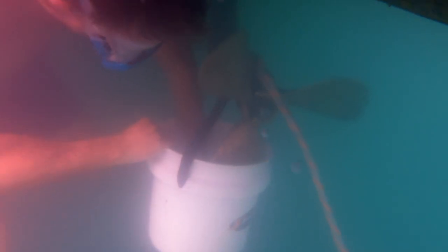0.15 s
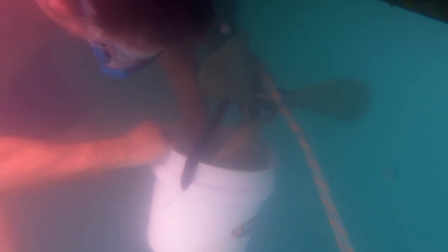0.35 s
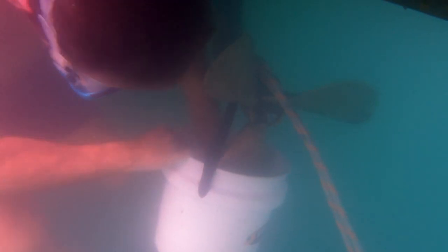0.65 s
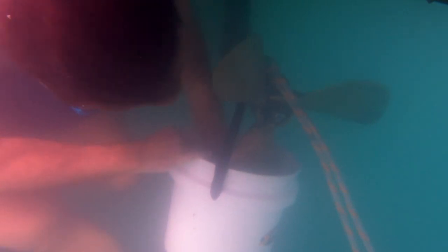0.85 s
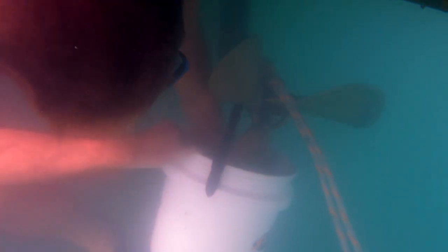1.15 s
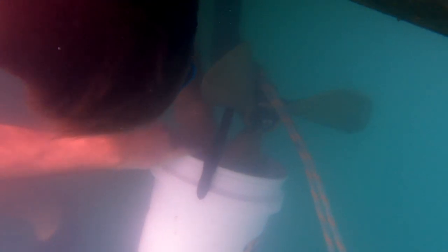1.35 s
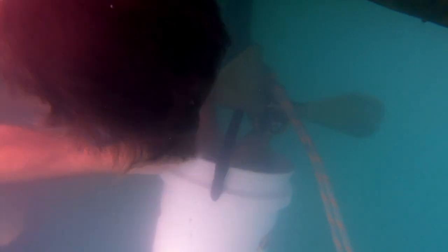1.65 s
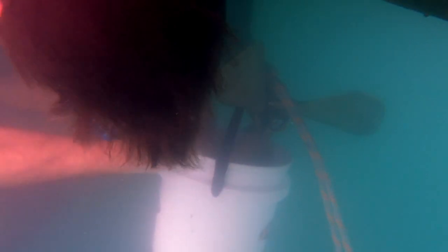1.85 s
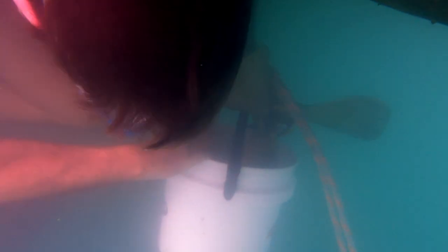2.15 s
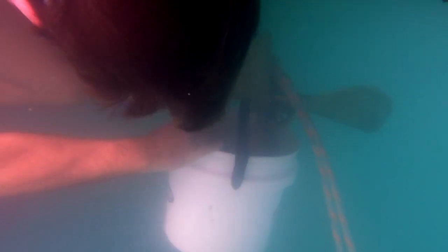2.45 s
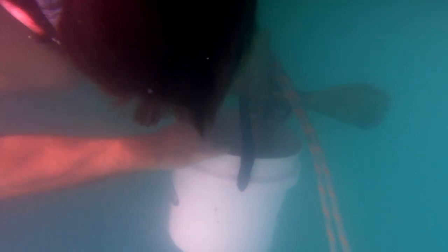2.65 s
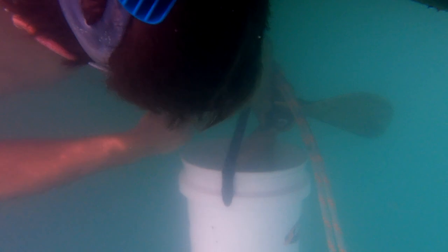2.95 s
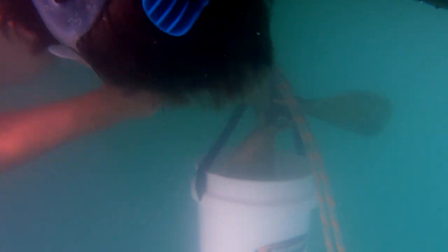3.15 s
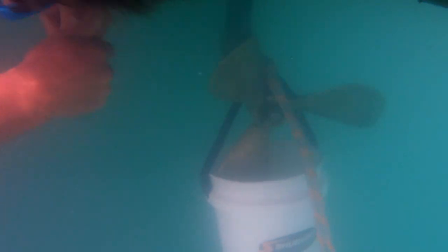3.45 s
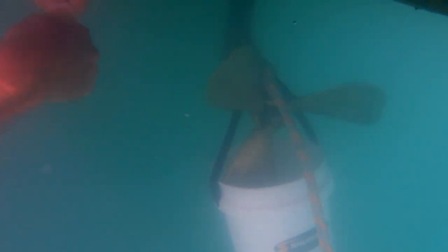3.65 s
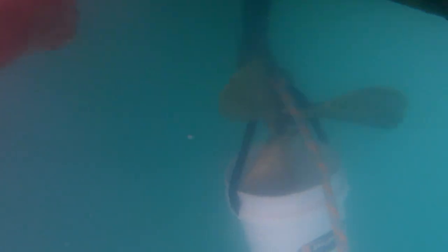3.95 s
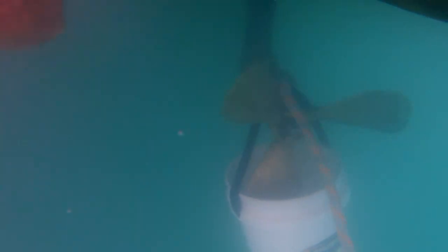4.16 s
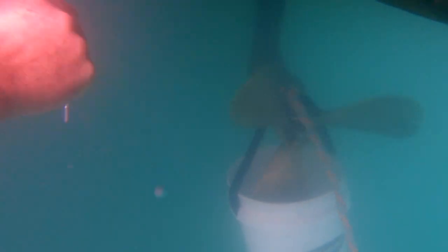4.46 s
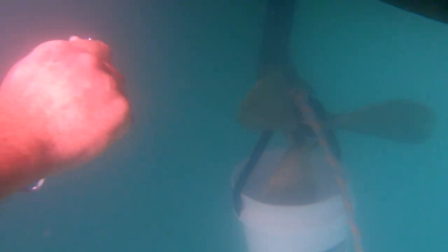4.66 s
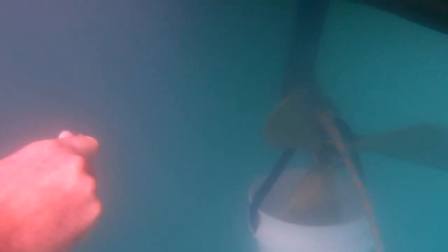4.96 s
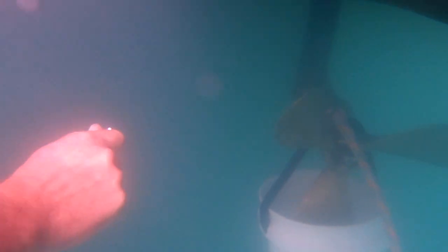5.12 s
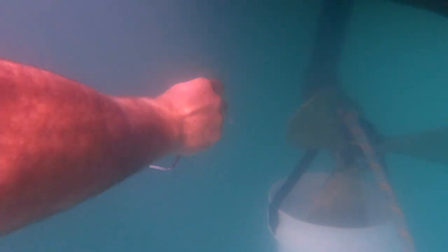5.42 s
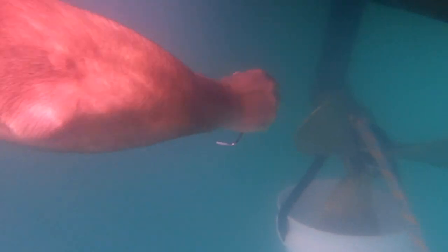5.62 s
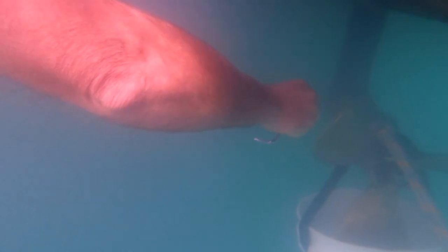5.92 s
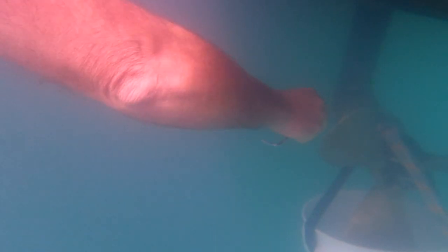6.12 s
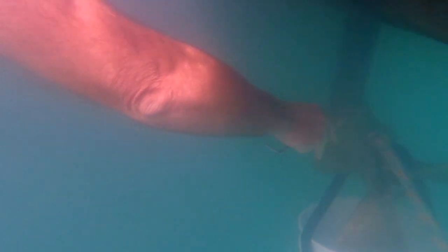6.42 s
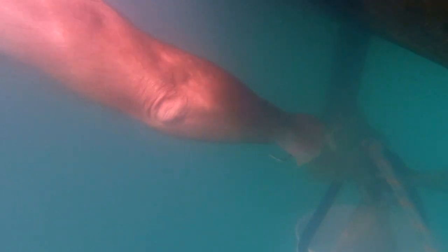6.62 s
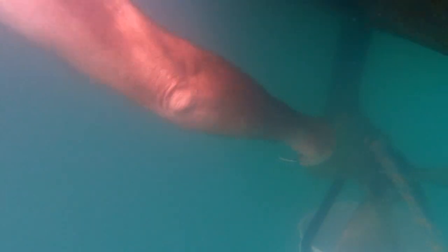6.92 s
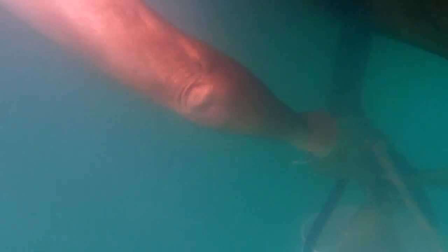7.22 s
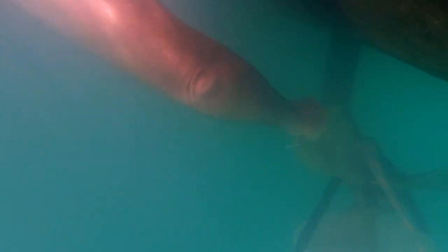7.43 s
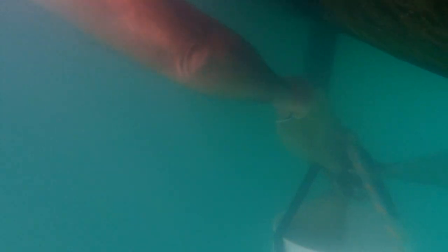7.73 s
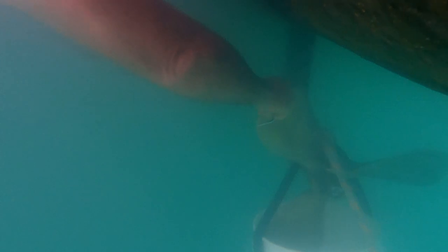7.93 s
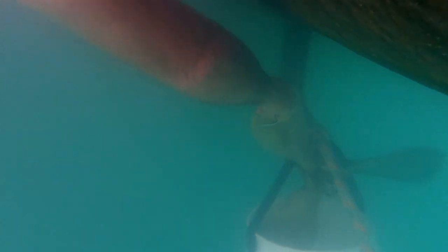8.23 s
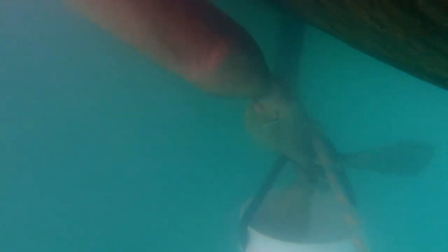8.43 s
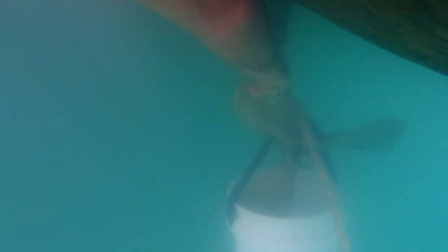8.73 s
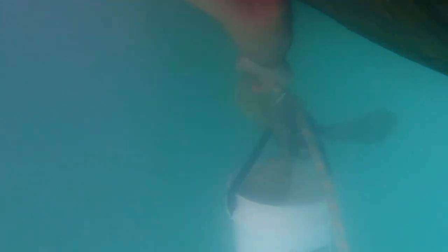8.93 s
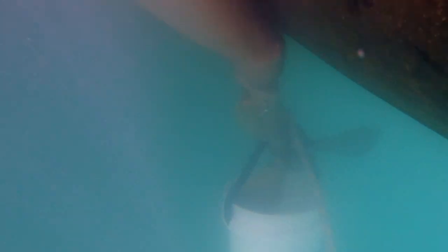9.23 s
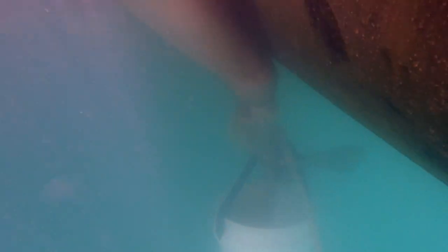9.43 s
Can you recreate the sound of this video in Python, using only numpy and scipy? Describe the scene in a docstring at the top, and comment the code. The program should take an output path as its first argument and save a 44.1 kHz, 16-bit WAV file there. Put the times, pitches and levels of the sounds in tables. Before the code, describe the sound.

Sealed-in underwater sound: bubbles crowd and gurgle, hands knock sharply at a boat propeller, a long watery rush passes, then small plops remain.

```python
"""A sealed camera hangs under a boat while a diver's hands work at the propeller; water rumbles on the case throughout.
It opens on a crowd of gulping air pockets and gurgling rushes, built from swelling, decaying gliding sines.
The gulps thin out after about 3 s; the hardest taps, clicks with noise tails ringing the case, land around 5 s.
A long rush follows, air pockets surge near 8.1 s, and the end is sparse: plops, faint taps and fizz of tiny ticks.
The recorder's gain control ducks after each loud blow."""
import sys
import numpy as np
from scipy import signal
from scipy.io import wavfile

SR = 44100
rng = np.random.default_rng(int(sys.argv[2]) if len(sys.argv) > 2 else 0)


def log_audio(samples):
    """Write samples as a 16-bit WAV file to the path given in sys.argv[1]."""
    # one column per channel
    frames = np.atleast_2d(samples).T
    # limit to full scale, then quantise
    limited = np.clip(frames, -1, 1)
    pcm = np.round(limited * 32767).astype(np.int16)
    wavfile.write(sys.argv[1], SR, pcm)


N = 422457


def from_db(db):
    """Decibels to linear gain."""
    return np.exp(np.asarray(db) * np.log(10) / 20)


def rms_one(x):
    """Bring a sound to an rms of 1."""
    return x / np.sqrt(np.mean(x ** 2) + 1e-20)


def drift(rate):
    """Slow random curve of rms 1: noise through two equal poles at `rate` Hz, drawn every 40 samples."""
    r = np.exp(-80 * np.pi * rate / SR)
    noise = rng.standard_normal(N // 40 + 2002)
    slow = signal.lfilter([1], [1, -2 * r, r * r], noise)[2000:]   # skip the filter's start
    return np.interp(np.arange(N) / 40, np.arange(len(slow)), rms_one(slow))


def in_time(rows):
    """Draw each column of a table as a curve over all samples; the first column is time in seconds."""
    s, *columns = np.transpose(rows)
    return [np.interp(np.arange(N) / SR, s, column) for column in columns]


def through(x, modes):
    """Parallel resonances of alternating polarity, each applied twice so that the valleys stay dark."""
    out = 0
    for k, (hz, width, db) in enumerate(modes):
        r = np.exp(-np.pi * width / SR)
        b = (1 - r * r) / 2 * np.array([1, 0, -1])
        a = [1, -2 * r * np.cos(2 * np.pi * hz / SR), r * r]
        once = signal.lfilter(b, a, x + 1e-18)
        out = out + (-1) ** k * from_db(db) * signal.lfilter(b, a, once)
    return out


def add(out, s, sound):
    """Mix a sound in at a time in seconds."""
    at = max(round(s * SR), 0)
    out[at:at + len(sound)] += sound[:N - at]


def bubble(hz, t60, glide, swell_s):
    """A pocket of air pinches off with a dip in pressure, swells and rings down while its pitch glides."""
    t60, swell_s = np.clip(t60, .008, .5), np.clip(swell_s, .0003, .03)
    full_s = 2 * swell_s   # swell_s is the time to half level
    t = np.arange(int((t60 + full_s) * SR)) / SR
    swell = np.sin(np.pi / 2 * np.minimum(t / full_s, 1)) ** 2
    decay = from_db(-60 * np.maximum(t - full_s, 0) / t60)
    return -swell * decay * np.sin(2 * np.pi * hz * (t + glide * t * t / t60))


# Large air pockets. Each row: time in seconds, level in dB before the case muffles it, starting pitch in Hz,
# base decay t60 in seconds, starting pitch of the second pocket in Hz, its level in dB above the first.
AIR_GULPS = [(0.102, -21, 363, 0.17, 301, -11), (0.161, -8, 494, 0.098, 295.5, 0),
             (0.387, -6, 508, 0.12, 295, -10), (0.482, -6.5, 302, 0.098, 520, -11),
             (0.631, -14.5, 311, 0.17, 323, -18), (0.676, -5, 312, 0.064, 281, 2),
             (0.704, 3, 271, 0.047, 272, -10), (0.782, -20, 286, 0.13, 151, 5.5),
             (0.856, -13, 515, 0.056, 232, -0.5), (0.887, -6, 409, 0.11, 309, -7),
             (0.941, -10.5, 362, 0.086, 181.4, -1.5), (0.975, -9.5, 292, 0.11, 279, -37),
             (1.02, -14, 300, 0.061, 313, -2.5), (1.09, -10.5, 537, 0.072, 286, -5),
             (1.127, -11.5, 417, 0.2, 117.4, -1), (1.146, 1, 339, 0.16, 227, -4),
             (1.219, -6.5, 435, 0.3, 227.4, -0.5), (1.303, -8, 305, 0.14, 198.4, 5.5),
             (1.351, -6.5, 610, 0.075, 239, 0), (1.424, 1.5, 412, 0.081, 219, -17),
             (1.458, -3, 392, 0.19, 239, -10), (1.608, -11.5, 456.5, 0.16, 236.5, 1),
             (1.745, 0.5, 364, 0.17, 236.3, 2.5), (1.787, -8, 346.4, 0.21, 300, -15),
             (1.835, -5, 452.5, 0.35, 214, -13.5), (1.912, -4, 407.4, 0.18, 239, -9.5),
             (1.964, -9.5, 364, 0.35, 209.4, -7.5), (1.999, -8, 419, 0.23, 254, -7.5),
             (2.043, -8, 385, 0.092, 255, -10), (2.211, -11, 622, 0.04, 242, -9),
             (2.258, -8.5, 536, 0.13, 122.6, -9.5), (2.303, -9.5, 474, 0.1, 263, -14.5),
             (2.345, -11.5, 451, 0.09, 213, -5.5), (2.554, -15.5, 592, 0.035, 202, -2.5),
             (2.762, -8.5, 533, 0.11, 104, -8.5), (3.162, -22, 280, 0.14, 118.5, 12),
             (3.185, -17.5, 292, 0.04, 234, 13), (3.252, -22.5, 425, 0.021, 237, 6),
             (3.407, -3, 497, 0.037, 185, -12.5), (3.492, -18, 350, 0.093, 226, 3),
             (3.569, -3.5, 322, 0.059, 246, -10.5), (3.6, -9.5, 300, 0.09, 113, 1.5),
             (3.903, -18.5, 455, 0.18, 92, -18), (3.928, -12, 537, 0.039, 185, -14),
             (3.966, -12, 527, 0.096, 210, 1.5), (4.036, -28, 474, 0.26, 229.7, 23.5),
             (4.088, -25.5, 417, 0.097, 243, 5), (4.326, -18.5, 330, 0.07, 105, 15.5),
             (4.357, -31.5, 365, 0.36, 92.5, 16.5), (4.226, -27.5, 456, 0.095, 273, 1),
             (4.788, -16, 592, 0.043, 92, -3), (4.936, -28, 342, 0.083, 214, 0),
             (5.294, -4, 314, 0.077, 302, -19), (5.328, -19.5, 343, 0.38, 131.3, 4.5),
             (5.49, -20, 384, 0.13, 125, -6), (5.576, -23, 407, 0.13, 131, -4),
             (5.996, -17.5, 405, 0.068, 250, -11.5), (6.06, -12, 356, 0.15, 202, -1.5),
             (6.089, -14, 304, 0.054, 189, 2), (6.165, -12, 355, 0.082, 239, -12),
             (6.301, -18, 414, 0.12, 265, 4), (6.329, -16.5, 395, 0.081, 190, 6),
             (6.795, -18, 323, 0.07, 216, -2), (7.177, -13.5, 344, 0.038, 125, 1),
             (7.555, -37, 414, 0.032, 253, 7.5), (7.623, -24.5, 307, 0.18, 90, -3),
             (8.402, -21.5, 285, 0.11, 174.5, 14.5), (8.531, -22, 263, 0.033, 94, 12.5),
             (8.693, -21.5, 345, 0.1, 105, -8), (9.212, -22.5, 558, 0.062, 340, 0)]


def gulps():
    """Each gulp is two fluttering pockets and the short pop of its neck closing."""
    pockets, pops = np.zeros((2, N))
    pop = bubble(260, .016, -0.13, .0016)
    for s, db, hz, t60, second_hz, second_db in AIR_GULPS:
        add(pockets, s - .002, from_db(db - 0.5) * bubble(hz, t60, 0.038, 0.0019))
        add(pockets, s - .0012, from_db(db + second_db - 1.0) * bubble(second_hz, 1.224 * t60, 0.1, 0.0018))
        add(pops, s - .001, from_db(db - 4) * pop)
    flutter_db = 2.2 * np.clip(drift(60.0), -3, 1.2)
    return pockets * from_db(flutter_db) + pops


# Pockets with their own swell, mostly slow, then a decay. Each row: time of full swell in seconds, level in dB
# before the muffling, starting pitch in Hz, swell to half level in seconds, t60 in seconds,
# glide as half the pitch share gained in a t60.
AIR_SURGES = [(5.278, -25, 670, 0.012, 0.11, 0.043), (5.654, -13.5, 481, 0.0092, 0.056, 0.22),
              (8.098, -11, 493, 0.014, 0.03, -0.079), (8.113, -2.5, 260, 0.015, 0.0097, -0.0079),
              (8.118, -10.5, 161.7, 0.0023, 0.13, -0.017)]


def surges():
    """Single pockets with their own swell and glide, each timed to be fully swollen on its row."""
    out = np.zeros(N)
    for s, db, hz, swell_s, t60, glide in AIR_SURGES:
        add(out, s - 2 * swell_s, from_db(db) * bubble(hz, t60, glide, swell_s))
    return out


def splashes():
    """Every gulp and surge throws up a dying burst of noise in one resonance."""
    level = np.zeros(N)
    dying = from_db(-60 * np.arange(int(.06 * SR)) / SR / 0.053)
    for s, db, *_ in AIR_GULPS:
        add(level, s - .001, from_db(db - 10.0) * dying)
    for s, db, *_ in AIR_SURGES:
        add(level, s - .008, from_db(db) * dying)
    return through(level * rng.standard_normal(N), [(530, 230, 0.011)])


# Stronger shoves of water on the case. Each row: time in seconds, level in dB before the muffling.
WATER_SHOVES = [(0.885, -15), (0.975, -10), (1.145, -2.5), (1.217, -16), (1.455, -5.5), (1.837, -3.5),
                (2.207, -25), (2.577, -13.5), (2.761, -16.5), (3.166, -12), (3.417, -1), (3.493, -13),
                (3.993, -8.5), (4.358, -17), (6.299, -15), (7.088, -17.5), (8.403, -5), (8.983, -10.5),
                (9.412, -13)]


def shoves():
    """Water thumps the case: one short low pulse whose pitch falls from 125 Hz."""
    out = np.zeros(N)
    shove = bubble(125, 0.036, -0.37, 0.0022)
    for s, db in WATER_SHOVES:
        add(out, s - .002, from_db(db) * shove)
    return out


# Slow seep of air between the rushes. Each row: time in seconds, gurgle level in dB, gurgle centre in Hz,
# swish level in dB before a fixed lift.
AIR_SEEP = [(0.0, -34, 358, -50), (0.36, -41.5, 398, -48.5), (0.42, -53, 508, -62), (0.47, -43, 389, -41.5),
            (1.07, -33, 331, -49.5), (1.55, -37.5, 390.5, -47.5), (1.8, -33, 341, -59.5),
            (2.2, -38, 413.5, -57), (2.6, -33, 293.3, -51), (2.95, -49.5, 199.5, -65.5),
            (3.3, -30.5, 253, -51.5), (4.2, -38.5, 248, -51), (4.55, -52, 153.4, -84),
            (5.2, -52.5, 202.8, -67.5), (5.65, -40, 447.4, -53.5), (6.55, -42, 202, -61),
            (7.05, -41, 171, -63), (7.6, -39.5, 172.8, -62.5), (8.05, -49, 182, -67),
            (8.17, -47.5, 176, -65), (8.32, -49, 173.7, -59), (8.65, -47, 204, -65.5),
            (9.58, -33.5, 171.7, -56)]
# Rushes of water and air past the case. Each row: start, swell, hold and fade in seconds, gurgle level in dB,
# gurgle centre in Hz, swish level in dB before a fixed lift.
AIR_RUSHES = [(0.096, 0.067, 0.054, 0.11, -21.5, 326, -68), (0.558, 0.12, 0.13, 0.066, -20.5, 232.2, -52),
              (1.065, 0.1, 0.24, 0.063, -20, 239.4, -47), (0.841, 0.02, 0.13, 0.081, -29.5, 332.5, -53),
              (1.574, 0.042, 0.034, 0.064, -21.5, 317.5, -55.5), (3.44, 0.049, 0.23, 0.15, -21, 231, -43.5),
              (3.913, 0.051, 0.065, 0.15, -18.5, 225.4, -40),
              (4.306, 0.02, 0.038, 0.063, -25, 164.7, -41.5), (4.704, 0.016, 0.13, .1, -38, 489, -55),
              (5.259, 0.018, 0.06, 0.23, -21.5, 198.4, -52), (5.728, 0.3, 0.33, 0.089, -19, 262.6, -51),
              (7.1, 0.049, 0.029, .1, -22.5, 239.5, -56), (7.486, 0.036, 0.042, 0.044, -39.5, 196.7, -49.5),
              (7.716, 0.027, 0.38, 0.013, -38.5, 202.3, -51), (8.363, 0.026, 0.1, 0.072, -42, 190.3, -55),
              (8.698, 0.11, .6, 0.23, -45, 188.5, -54.5)]


def flow():
    """Seep and rushes add up; the gurgle's centre leans to whichever is stronger."""
    t = np.arange(N) / SR
    seep_db, seep_hz, swish_db = in_time(AIR_SEEP)
    air, swish_level = from_db(seep_db), from_db(swish_db)
    weighted_hz = air * seep_hz
    for s, swell_s, hold_s, fade_s, db, hz, rush_swish_db in AIR_RUSHES:
        edges = s + np.cumsum([0, swell_s, hold_s, fade_s])
        shape = np.interp(t, edges, [0, 1, 1, 0]) ** 2
        rush = from_db(db) * shape
        air = air + rush
        weighted_hz = weighted_hz + rush * hz
        swish_level = swish_level + from_db(rush_swish_db) * shape
    return 20 * np.log10(air), weighted_hz / air, 20 * np.log10(swish_level)


def gurgle(centre_hz, per_s, spread, cycles):
    """A random stream of bubbles scattered `spread` octaves about a centre, ringing for `cycles`; rms 1."""
    out, count = np.zeros(N), int(per_s * N / SR)
    when, chance = rng.uniform(0, N / SR, count), rng.standard_normal((count, 3))
    for s, (pitch, level, bend) in zip(when, chance):
        hz = np.clip(centre_hz[int(s * SR)] * 2 ** (spread * pitch), 90, 2300)
        add(out, s, from_db(4.0 * level) * bubble(hz, cycles / hz, 0.097 * bend, 0.44 / hz))
    return rms_one(out)


# Single plops and bubbles, low and high. Each row: time in seconds, level in dB before the wobble,
# starting pitch in Hz, t60 in seconds.
SINGLE_BUBBLES = [(0.481, -14, 600, 0.035), (1.302, -19.5, 656, 0.032), (1.353, -20, 1374, 0.066),
                  (1.609, -21.5, 595, 0.038), (0.631, -21.5, 887, 0.043), (0.71, -16.5, 1038, 0.075),
                  (0.851, -32.5, 908, 0.19), (1.21, -22.5, 922, 0.065), (1.749, -21.5, 926, 0.047),
                  (1.838, -15.5, 917, 0.075), (2.037, -18, 866, 0.11), (2.325, -29, 853, 0.063),
                  (2.688, -29, 768, 0.097), (3.402, -19, 958, 0.046), (3.474, -27, 867, 0.053),
                  (3.678, -20, 880, 0.029), (3.705, -20, 1300, 0.042), (3.968, -21.5, 895, 0.047),
                  (4.974, -38.5, 1160, 0.098), (5.28, -16.5, 1070, 0.037), (6.144, -26, 748, 0.06),
                  (6.85, -33, 860, 0.033), (6.902, -36.5, 765, 0.12), (7.095, -31, 853, 0.04),
                  (7.168, -30.5, 750, 0.031), (7.36, -38, 714, .05), (7.364, -28.5, 336, 0.088),
                  (7.421, -23, 339, 0.087), (7.489, -20, 277, 0.07), (7.789, -29, 560, 0.042),
                  (8.81, -43, 875, 0.035), (8.921, -27, 573, 0.023), (8.982, -26.5, 577, .04),
                  (9.072, -30, 600, .03), (9.11, -21.5, 520, 0.025), (9.179, -30, 605, .035),
                  (9.371, -23.5, 546, 0.027), (9.46, -27, 580, 0.038), (6.131, -17, 445, 0.045),
                  (3.4752, -22.5, 1750, 0.02), (3.51, -26, 1615, 0.031), (3.716, -23, 1875, 0.046),
                  (3.8065, -35.5, 1980, 0.042), (3.862, -28, 1850, 0.054), (5.1866, -19.5, 1737, 0.043),
                  (5.1993, -22.5, 1620, 0.019), (5.386, -27.5, 1635, 0.034), (6.218, -27, 1484, 0.022),
                  (7.5577, -28, 2110, 0.03), (7.559, -29, 1480, 0.02), (7.558, -26, 723, 0.015),
                  (1.769, -35, 1393, 0.06), (1.809, -37.5, 1320, 0.071)]


def blips():
    """Single plops and bubbles, low and high; one shared level wobble stands for their wobbling as they rise."""
    out = np.zeros(N)
    for s, db, hz, t60 in SINGLE_BUBBLES:
        add(out, s - .002, from_db(db) * bubble(hz, t60, 0.04, 0.0015))
    return out * from_db(2.2 * drift(120.0))


# Taps on metal and case. Each row: time in seconds, relative drive in dB, brightness in dB (extra drive to the
# upper resonances, before a fixed trim), tail t60 in seconds (held to 0.3 at most).
CASE_TAPS = [(0.0348, -33, -30, .05), (0.116, -34, -13, 0.17), (0.205, -36.5, -19, 0.062),
             (0.257, -37.5, -11.5, 0.042), (0.345, -52, -12, 0.2), (0.471, -55.5, 1.5, 0.13),
             (0.48, -29, -14, 0.04), (0.541, -46.5, -7, 0.15), (0.576, -41, -10, .05),
             (0.63, -38, -13.5, 0.091), (0.6605, -43.5, -7, 0.086), (0.75, -41, -18, .05),
             (0.7956, -42.5, -18, 0.069), (0.908, -32, -29, 0.076), (0.9375, -41, -13, 0.049),
             (0.9625, -44, -10, .05), (1.0085, -46, -7, 0.066), (1.0443, -48, -4, .06),
             (1.096, -48.5, -10.5, .08), (1.1454, -51.5, -12, 0.034), (1.1975, -43.5, -4.5, 0.068),
             (1.243, -51, -5, 0.096), (1.325, -46.5, -8, 0.078), (1.571, -49.5, -13, 0.063),
             (1.675, -47, -8.5, 0.058), (1.8705, -44, -8, 0.06), (1.924, -49.5, -2.5, .05),
             (2.104, -50.5, -12, 0.054), (2.319, -29, -27, 0.12), (2.5248, -37, -7, 0.038),
             (2.689, -38.5, -12, 0.044), (3.167, -30.5, -6.5, 0.1), (3.275, -33, -26, 0.078),
             (3.302, -39.5, -3, 0.074), (3.404, -25.5, -28.5, 0.048), (3.5656, -19.5, -30, 0.34),
             (3.714, -31, -14.5, 0.061), (3.78, -31.5, -16.5, 0.053), (3.819, -33.5, -6.5, 0.091),
             (3.915, -49, -11, .05), (3.931, -41, -34, 0.12), (4.1, -33.5, -13, 0.15),
             (4.225, -24, -8.5, 0.13), (4.3115, -32.5, -22, 0.2), (4.396, -27, -8, 0.12),
             (4.661, -40.5, -4.5, 0.073), (4.789, -15, -31, 0.084), (4.87, -26, -16, 0.15),
             (4.933, -10, -8.5, 0.085), (5.051, -3.5, -12.5, 0.022), (5.062, -22, -15, 0.14),
             (5.1329, -8, -11.5, 0.081), (5.1402, -16, -16, 0.13), (5.1887, -17.5, -30, 0.061),
             (5.2774, -9, -18.5, 0.26), (5.288, -12, -20.5, 0.11), (5.324, -20, -31, 0.057),
             (5.349, -25.5, -11, 0.17), (5.4113, -37, -1, 0.044), (5.439, -34, -7, 0.043),
             (5.5306, -32.5, -13.5, 0.16), (5.557, -38.5, -7, 0.046), (5.7197, -41.5, -9.5, 0.093),
             (5.786, -43, -1.5, 0.04), (5.9823, -44, -6, 0.071), (6.0338, -36.5, -8, 0.15),
             (6.391, -45, 0, 0.087), (6.4497, -48, -7, 0.081), (6.5784, -44.5, -8.5, 0.12),
             (6.6566, -47, -9, 0.033), (6.74, -52.5, -5.5, .06), (6.9328, -44, -5.5, 0.1),
             (7.125, -21, -13, 0.11), (7.204, -43, -9, 0.1), (7.5194, -30.5, -14, 0.17),
             (7.6223, -52.5, -4, 0.13), (7.689, -40.5, -5, 0.13), (7.878, -46, -10, 0.087),
             (7.959, -41.5, -6.5, 0.37), (8.104, -29, -26, 0.039), (8.557, -50.5, -8.5, 0.072),
             (8.779, -47.5, -8.5, 0.17), (8.995, -51, -5.5, 0.067), (9.128, -49, -5.5, 0.063),
             (9.24, -45.5, -3.5, 0.069), (9.453, -53, 1, 0.17)]


def taps():
    """A click and a noisy scraping tail, as drives for the lower and upper case resonances."""
    low, high = np.zeros((2, N))
    t = np.arange(int(.12 * SR)) / SR
    for s, db, bright_db, t60 in CASE_TAPS:
        # a soft tap is mostly scrape, a hard one mostly click
        tail_db = -21.5 + (0.67 - 1) * (db + 37.5)
        blow = from_db(tail_db - 60 * t / np.clip(t60, .004, .3)) * rng.standard_normal(len(t))
        blow *= np.minimum(t / 0.0019, 1)   # the scrape rises in 1.9 ms
        blow[0] += 1   # the click
        add(low, s, from_db(db + 34) * blow)
        add(high, s, from_db(db + bright_db + 31.5) * blow)
    return low, high


# Rough grain from rubbing hands and swarms of bubbles. Each row: start, swell, hold and fade in seconds,
# level in dB before the lumps, centre in Hz, width of the first resonance in Hz.
GRAIN_BURSTS = [(0.624, 0.0051, 0.079, .03, -43.5, 990, 690), (0.842, 0.0047, 0.048, 0.019, -39, 953, 400),
                (0.96, 0.0038, 0.024, 0.017, -49.5, 1500, 690),
                (1.092, .004, 0.026, 0.032, -51.5, 1184, 1200), (1.196, .005, 0.033, .05, -47, 950, 500),
                (1.333, 0.0057, 0.023, 0.02, -45.5, 1340, 352), (3.461, 0.022, 0.029, 0.02, -51, 3020, 450),
                (3.556, 0.0063, 0.07, 0.065, -56, 1510, 1170), (3.598, .005, 0.03, 0.032, -47, 3000, 800),
                (3.653, 0.011, 0.059, 0.027, -37, 1225, 490), (3.74, 0.0085, 0.039, 0.033, -42, 1000, 696),
                (3.941, 0.0077, 0.029, 0.019, -28.5, 1716, 400), (3.966, 0.0041, 0.04, .04, -28, 472, 342),
                (3.992, 0.0029, 0.0089, 0.016, -27, 1770, 400), (4, .005, 0.034, 0.023, -52, 2950, 600),
                (4.006, .01, 0.031, 0.025, -44.5, 1700, 695), (5.267, 0.0084, 0.04, 0.039, -22, 1670, 497),
                (5.279, 0.0087, 0.063, 0.14, -29, 347, 400), (5.281, .003, .01, 0.026, -34.5, 3030, 500),
                (5.335, 0.0091, .05, 0.092, -46, 1760, 450), (5.801, .2, 0.34, .18, -33, 460, 372),
                (5.811, 0.0035, 0.0092, 0.0076, -51.5, 1410, 400),
                (5.87, 0.0034, 0.01, 0.009, -50.5, 1530, 700), (5.907, .003, 0.017, 0.024, -47, 1280, 880),
                (6.108, 0.0022, 0.0092, 0.0085, -54, 1400, 796),
                (6.139, 0.0026, 0.014, 0.024, -49, 1830, 506),
                (6.154, 0.0025, 0.015, 0.0078, -42, 1380, 350),
                (7.548, .003, 0.0077, 0.015, -49, 1270, 1520),
                (7.736, 0.063, 0.29, 0.027, -53.5, 1323, 129), (7.74, 0.051, 0.29, 0.025, -47.5, 914, 200),
                (8.072, 0.02, 0.017, 0.0085, -35.5, 1370, 150),
                (8.073, 0.022, 0.012, 0.0083, -37.5, 1800, 201),
                (8.103, .003, 0.0037, 0.0058, -27, 865, 695), (8.399, 0.0022, 0.0043, .01, -36, 800, 500),
                (8.525, 0.0032, 0.0042, .01, -41.5, 920, 610), (8.721, 0.075, 0.71, 0.11, -47.5, 867, 220)]


def rattles(per_s, grain_db):
    """Each burst is a run of uneven grains ringing about one centre, narrow or broad by row."""
    out = np.zeros(N)
    for s, swell_s, hold_s, fade_s, db, hz, width in GRAIN_BURSTS:
        edges = np.cumsum([0, swell_s, hold_s, fade_s])
        size = int(edges[-1] * SR)
        grains = from_db(grain_db * np.minimum(rng.exponential(1, size), 4)) * rng.standard_normal(size)
        grains *= rng.random(size) < per_s / SR
        ringing = through(through(grains, [(hz, width, 0)]), [(hz, 2 * width, 0)])
        shape = np.interp(np.arange(size) / SR, edges, [0, 1, 1, 0]) ** 2
        add(out, s, from_db(db) * shape * rms_one(ringing))
    return out * from_db(2.1 * drift(27.0))   # the grain comes in lumps


# Fizz in the case. Each row: time in seconds, relative drive in dB to the lower resonances, and to the upper ones.
FIZZ_LEVELS = [(0.0, -57, -60.5), (0.43, -71.5, -79.5), (0.8, -45.5, -71.5), (1.17, -61, -61.5),
               (1.41, -54, -75.5), (2.32, -63, -73.5), (2.51, -49.5, -69.5), (3.04, -51.5, -62),
               (3.63, -32, -60.5), (3.84, -44, -61), (3.97, -48.5, -58), (4.27, -35.5, -53.5),
               (4.48, -45.5, -60), (4.77, -42.5, -62), (5.04, -36, -55), (5.28, -40.5, -57.5),
               (5.58, -61.5, -68), (5.82, -67, -69), (5.95, -54, -66), (6.11, -59, -70),
               (6.51, -66.5, -70.5), (7.55, -63.5, -69.5), (7.76, -55, -65), (7.95, -48, -64),
               (8.11, -72.5, -74), (8.78, -72, -76.5), (8.96, -65, -65.5), (9.58, -70, -64)]


def fizz(per_s, grain_db):
    """Tiny bubbles tick softly, in clumps, over a bed of noise, as drives for the case resonances."""
    low_db, high_db = in_time(FIZZ_LEVELS)
    sizes = from_db(grain_db * np.minimum(rng.exponential(1, N), 5)) * rng.choice([-1, 1], N)
    clumps = from_db(7.0 * drift(14.0))
    grains = sizes * (rng.random(N) < per_s * clumps / SR)
    ticks = rms_one(grains) + 0.082 * rng.standard_normal(N)
    return from_db(low_db + 11.5) * ticks, from_db(high_db + 12.5) * ticks


# Lower and upper resonances of the case. Each row: centre in Hz, width of one pass in Hz, level in dB.
LOWER_CASE_MODES = [(1750, 312, -3), (1236, 200, -15.5), (1953, 300, -11), (860, 540, -27),
                    (1574, 92, -8.5)]
UPPER_CASE_MODES = [(2786, 470, 3), (2978, 760, -3.5), (3630, 210, -4.5), (3920, 960, -12.5),
                    (6240, 1200, -26.5), (7280, 1200, -32)]


def case_ring(low, high):
    """The case rings in its own resonances when taps and fizz drive it."""
    return through(low, LOWER_CASE_MODES) + through(high, UPPER_CASE_MODES)


def wash(modes, patchy_db, rate):
    """Noise in resonances that flicker partly together and partly alone; rms 1."""
    together, white = drift(rate), rng.standard_normal((2, N))
    out = np.zeros(N)
    for k, (hz, width, db) in enumerate(modes):
        band = rms_one(through(white[k % 2], [(hz, width, 0)]))
        flicker_db = patchy_db * (1.6 * together + drift(rate))
        out += band * from_db(db + flicker_db)
    return rms_one(out)


# Bands of the swish. Each row: centre in Hz, width of one pass in Hz, relative level in dB before flicker.
SWISH_BANDS = [(380.4, 110, 8), (555, 200, 4), (850, 520, -9.5), (990, 2100, -12.5), (1360, 140, -17),
               (715, 820, -4)]


def swish(swish_db):
    """Water and air hiss past the case as flickering bands of noise."""
    return from_db(swish_db + 12.5) * wash(SWISH_BANDS, patchy_db=2.0, rate=16.0)


# Low resonances of the rumble. Each row: centre in Hz, width of one pass in Hz, relative level in dB before flicker.
RUMBLE_BANDS = [(17.9, 13, 0), (32.7, 24.5, 2), (53.7, 29, 3), (99, 60, -6), (166, 150, -15.5)]
# Water pushing on the case. Each row: time in seconds, rumble level in dB before a 2 dB trim.
WATER_MOTION = [(0.0, -29.5), (0.16, -24), (0.45, -33), (1.09, -21), (1.79, -20.5), (1.87, -16),
                (2.53, -33.5), (3.71, -23), (4.3, -31), (4.32, -23), (5.02, -34.5), (5.36, -29.5),
                (5.68, -32), (6.13, -18.5), (6.56, -29.5), (7.23, -17.5), (8.03, -21.5), (8.3, -33.5),
                (8.38, -25), (9.58, -21)]


def rumble():
    """Moving water pushes on the case: low noise bands that follow the motion."""
    (rumble_db,) = in_time(WATER_MOTION)
    return from_db(rumble_db - 2.0) * wash(RUMBLE_BANDS, patchy_db=-0.5, rate=11.0)


def scene():
    """All sources reach one capsule; the two channels differ only by a faint late copy."""
    gurgle_db, centre_hz, swish_db = flow()
    air = gulps() + surges() + splashes() + shoves()
    air += from_db(gurgle_db) * gurgle(centre_hz, per_s=220.0, spread=0.632, cycles=19.0)
    air += swish(swish_db)
    # the case muffles the water above 1650 Hz
    mid = signal.sosfilt(signal.butter(4, 1650, fs=SR, output="sos"), air)
    # a finer bubble stream needs both moving water and escaping air
    fine_db = swish_db + 0.8 * (gurgle_db + 19.5)
    mid += from_db(fine_db) * gurgle(np.full(N, 900.0), per_s=73.0, spread=0.3, cycles=180.0)
    mid += blips() + rattles(per_s=1500.0, grain_db=3.0)
    tap_low, tap_high = taps()
    fizz_low, fizz_high = fizz(per_s=4000.0, grain_db=5.0)
    mid += case_ring(tap_low + fizz_low, tap_high + fizz_high)
    mid += rumble()
    bright = signal.sosfilt(signal.butter(2, 450, "high", fs=SR, output="sos"), mid)
    late = np.pad(bright, (150, 0))[:N]   # 150 samples, 3.4 ms
    return mid + from_db(-48.5) * late * [[1], [-1]]


def duck(x, threshold_db, share, release_db_s, attack_s, ahead):
    """Gain falls by a share of the excess over a threshold and climbs back steadily; `ahead` is in samples."""
    t, r = np.arange(N) / SR, np.exp(-1 / (attack_s * SR))
    peak_db = 20 * np.log10(np.abs(x).max(axis=0) + 1e-9)
    over_db = np.maximum(peak_db - threshold_db, 0)
    held_db = np.maximum.accumulate(over_db + release_db_s * t) - release_db_s * t
    smooth_db = signal.lfilter([(1 - r) ** 2], [1, -2 * r, r * r], held_db)
    early_db = np.pad(smooth_db[ahead:], (0, ahead), "edge")
    return x * from_db(-share * early_db)


def record(dry):
    """Slow gain control, then a limiter that looks ahead; faint hiss; the top is cut."""
    levelled = duck(dry, threshold_db=-7.5, share=0.44, release_db_s=49.0, attack_s=0.011, ahead=0)
    limited = duck(levelled, threshold_db=-1.5, share=1, release_db_s=150, attack_s=.0008, ahead=220)
    hissing = limited + from_db(-112) * rng.standard_normal(N)   # the same hiss in both channels
    # 70 dB down from 14.9 kHz up
    return signal.sosfilt(signal.cheby2(12, 70, 14900, fs=SR, output="sos"), hissing)


dry = scene()
out = record(dry)
log_audio(out)
```